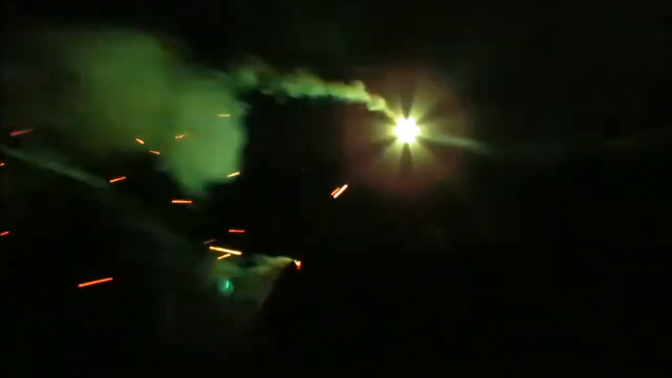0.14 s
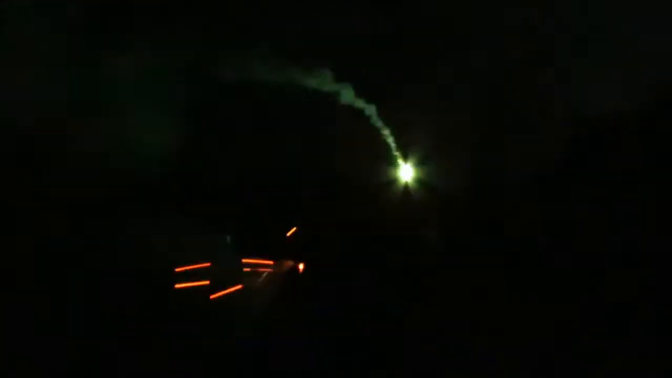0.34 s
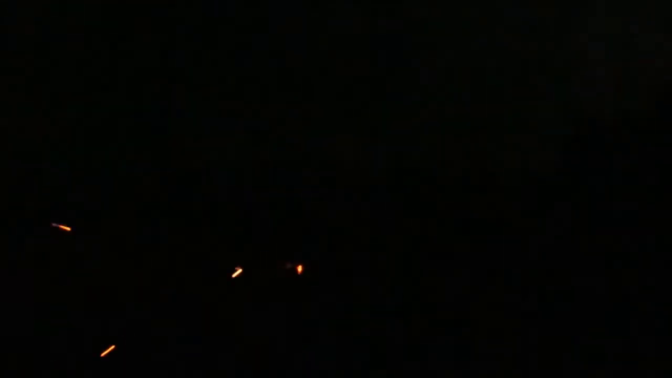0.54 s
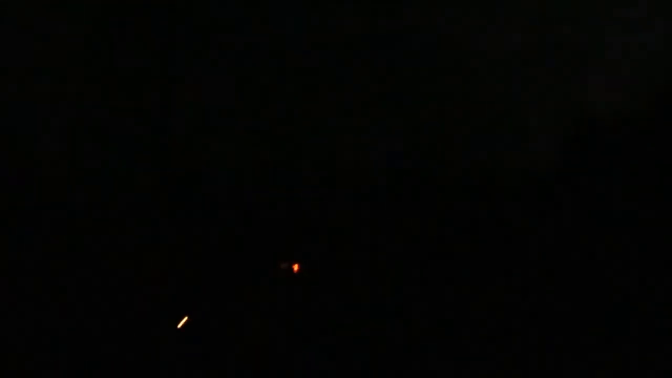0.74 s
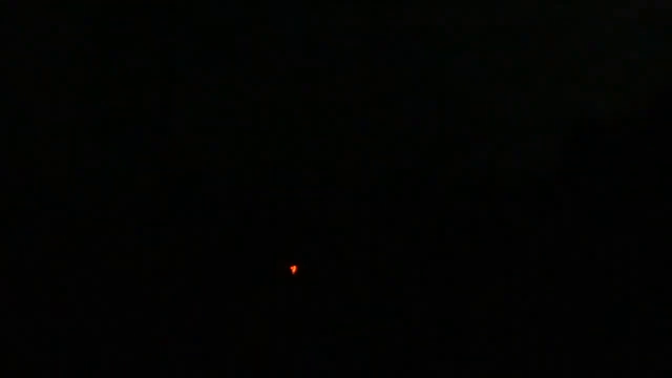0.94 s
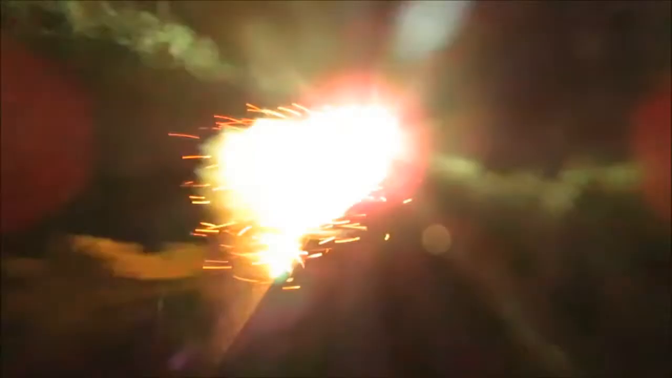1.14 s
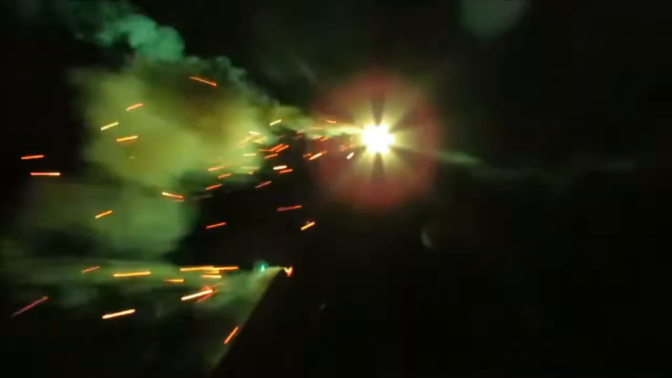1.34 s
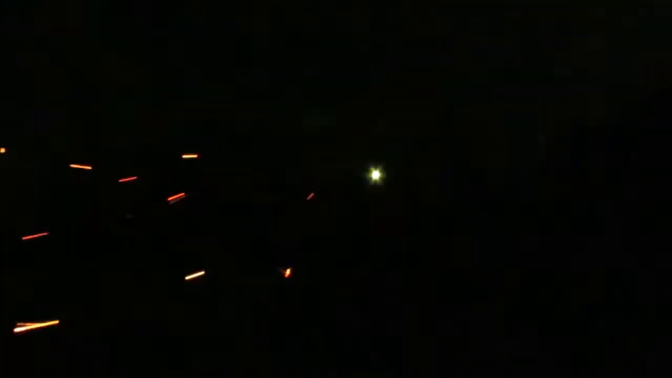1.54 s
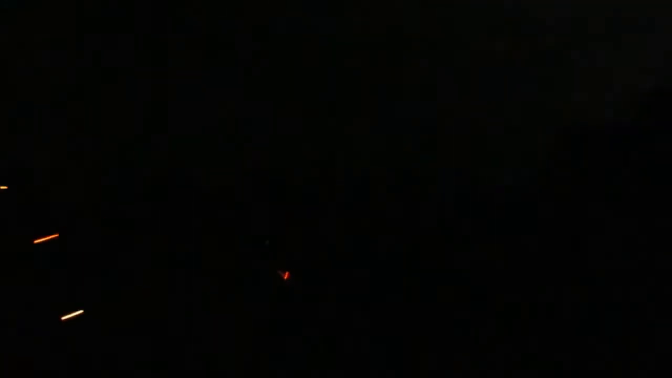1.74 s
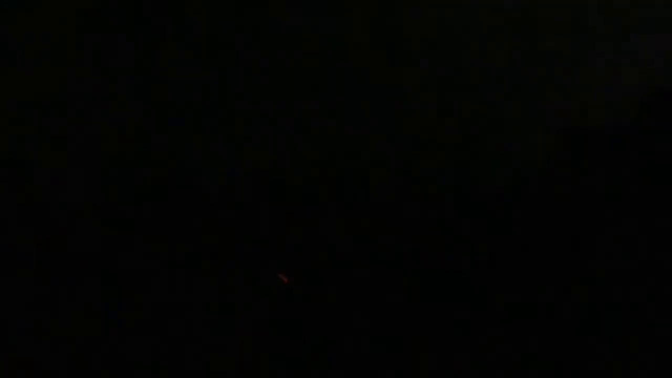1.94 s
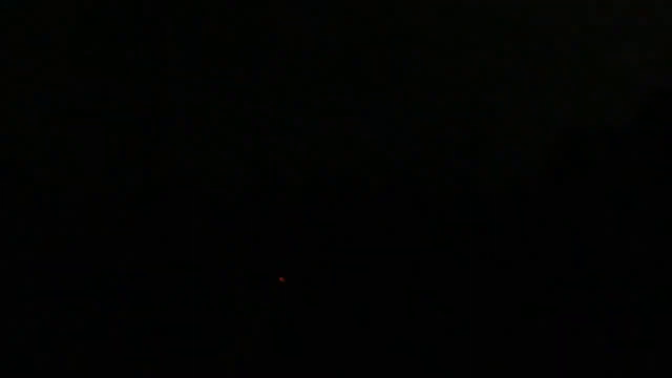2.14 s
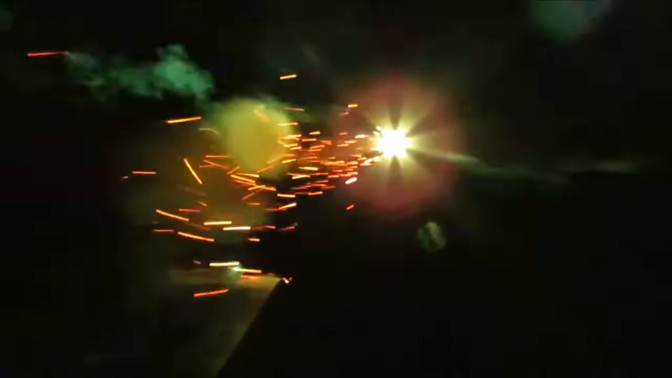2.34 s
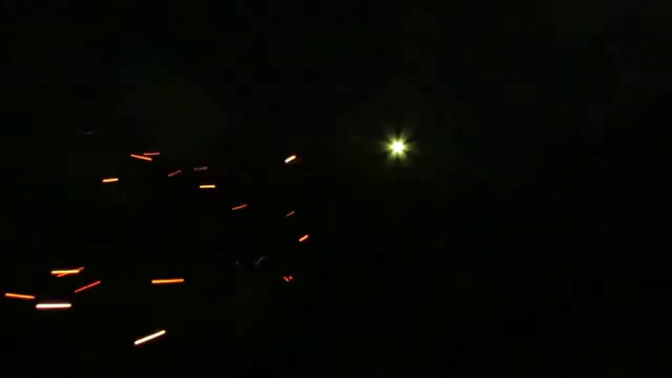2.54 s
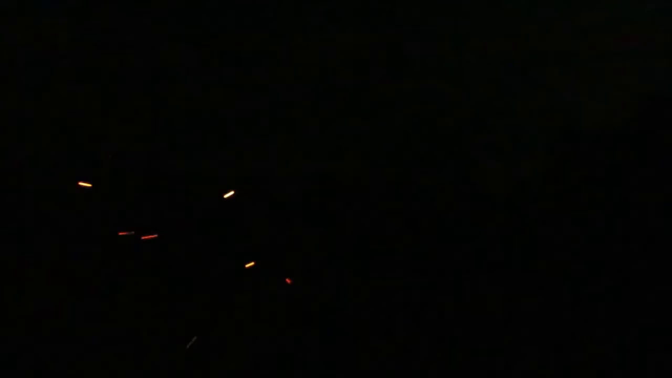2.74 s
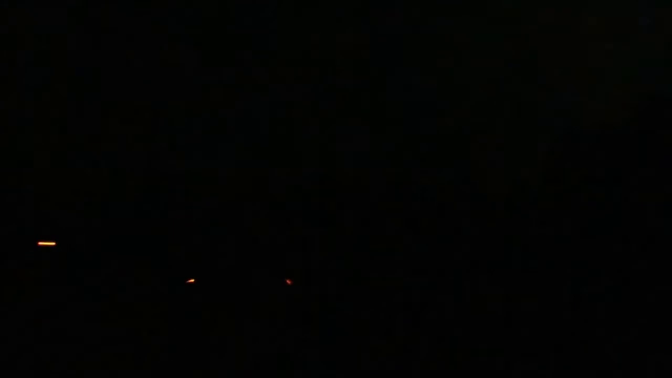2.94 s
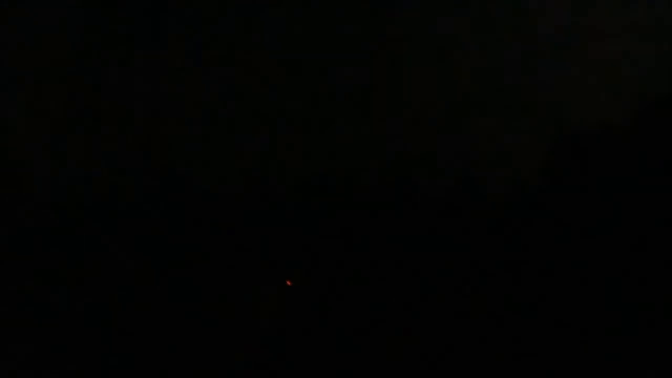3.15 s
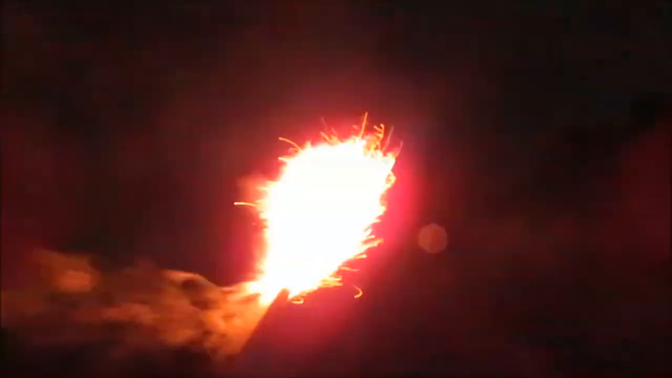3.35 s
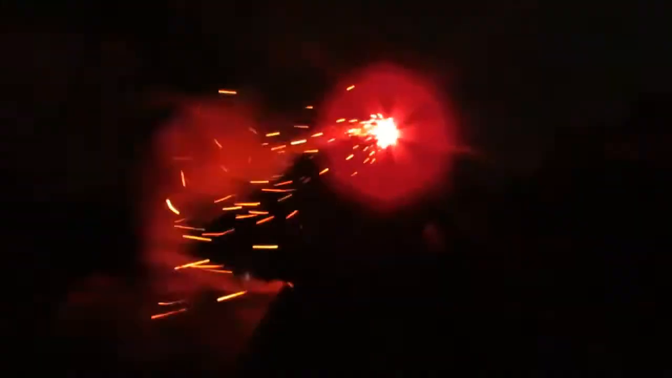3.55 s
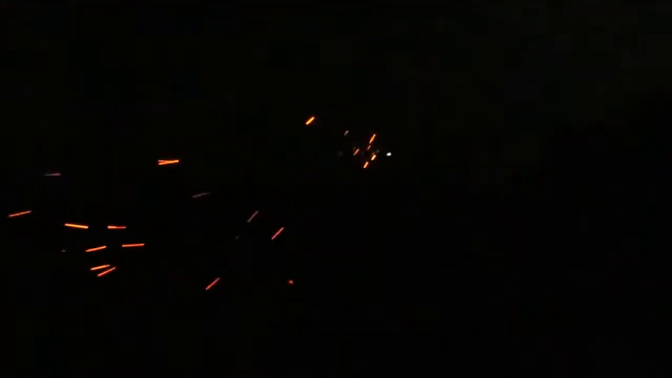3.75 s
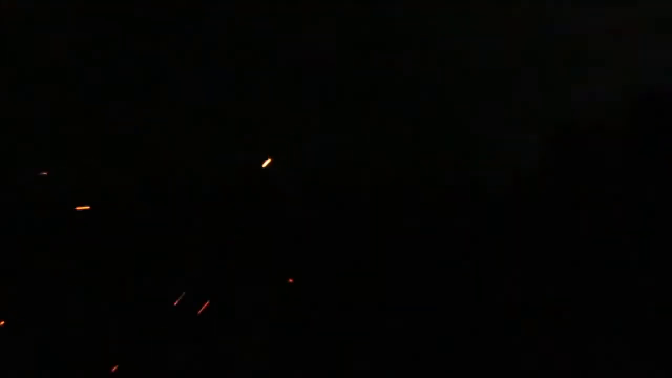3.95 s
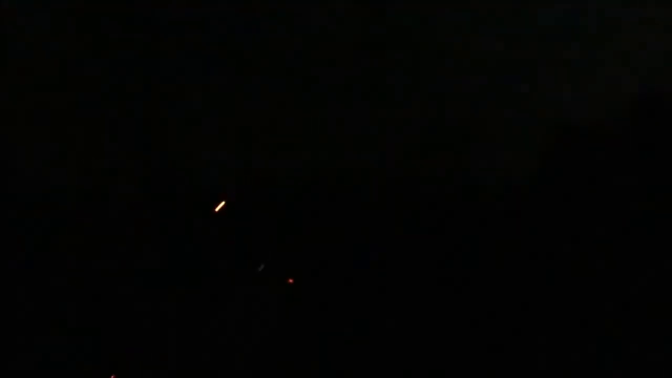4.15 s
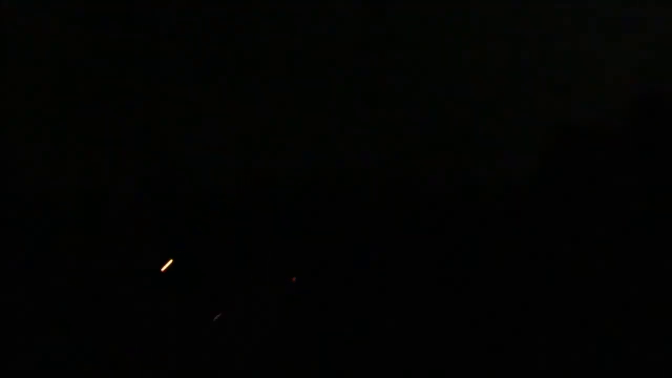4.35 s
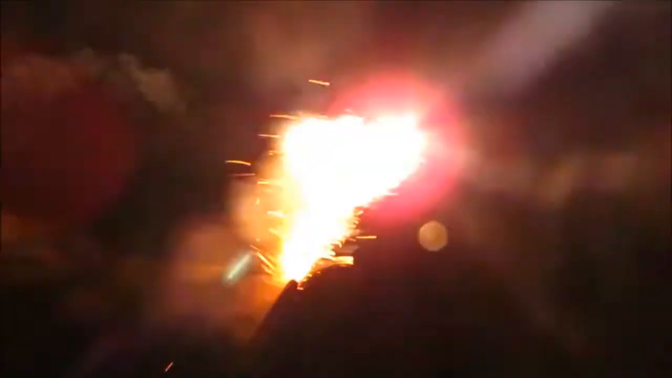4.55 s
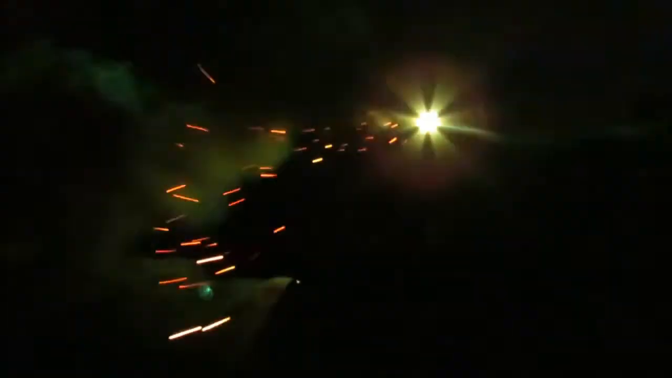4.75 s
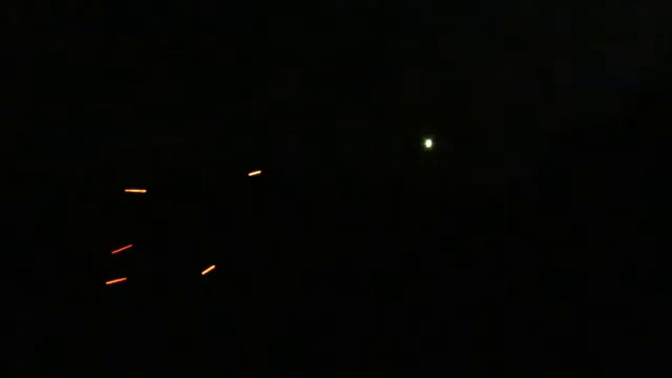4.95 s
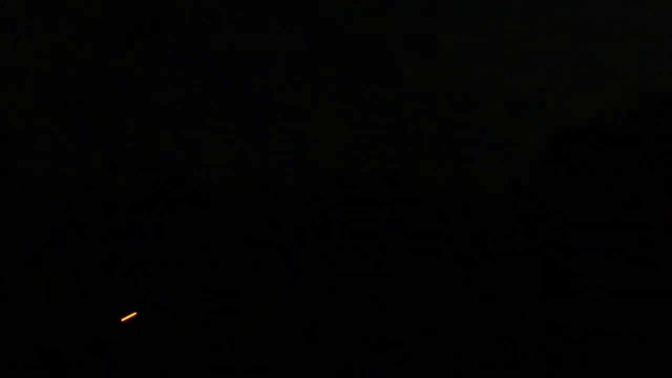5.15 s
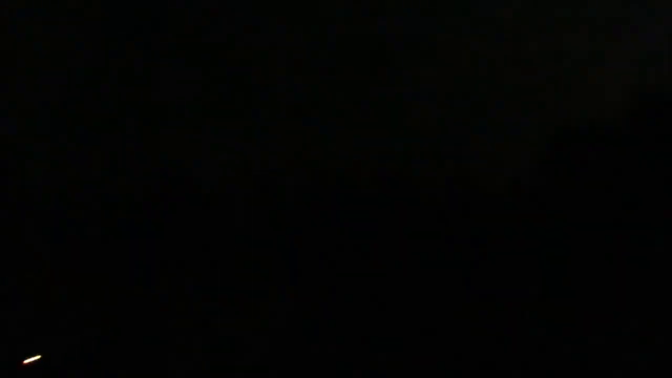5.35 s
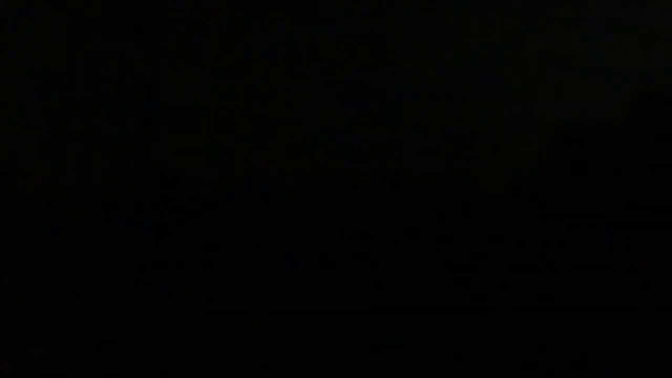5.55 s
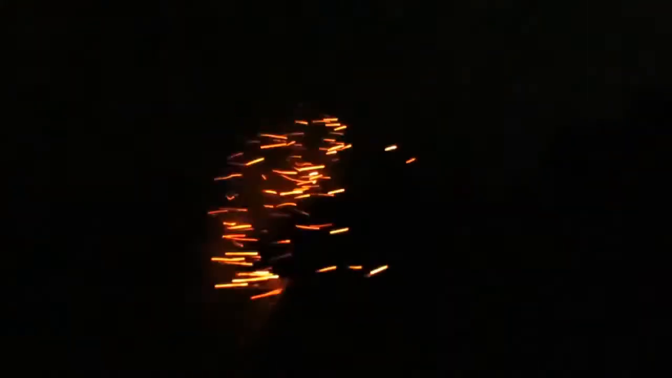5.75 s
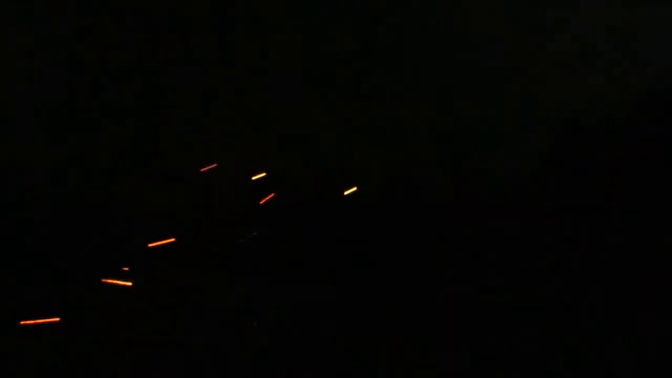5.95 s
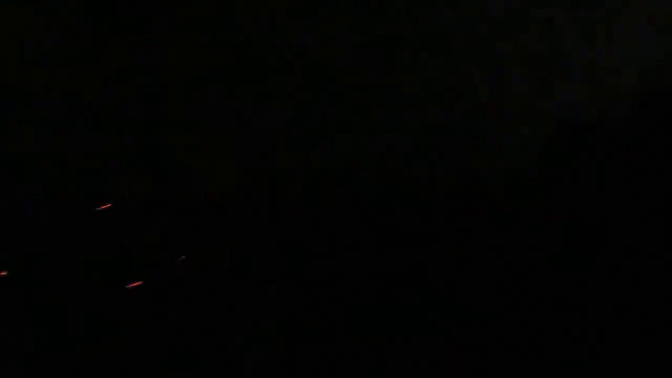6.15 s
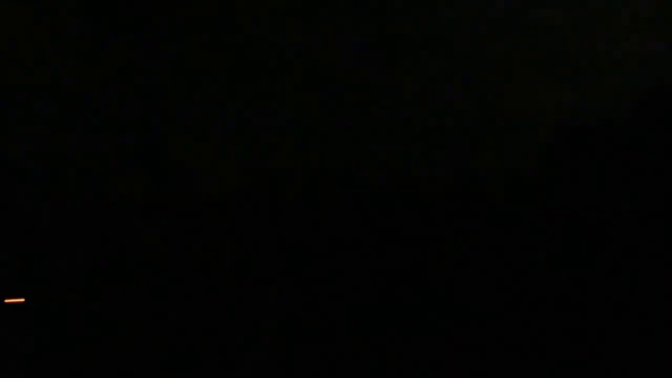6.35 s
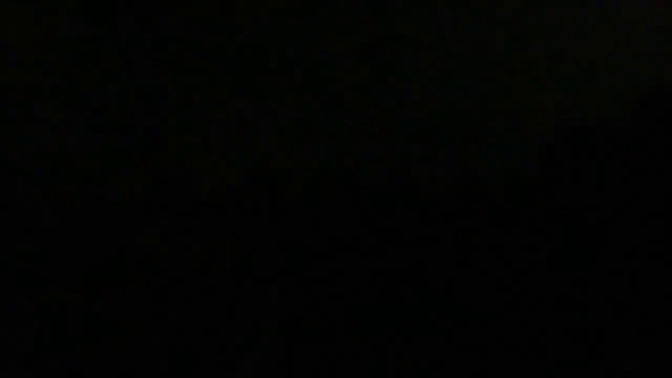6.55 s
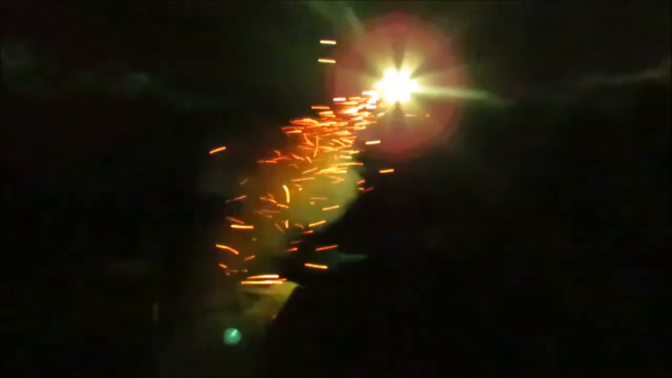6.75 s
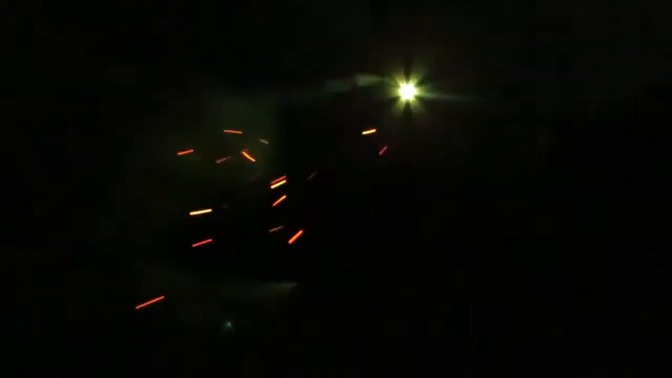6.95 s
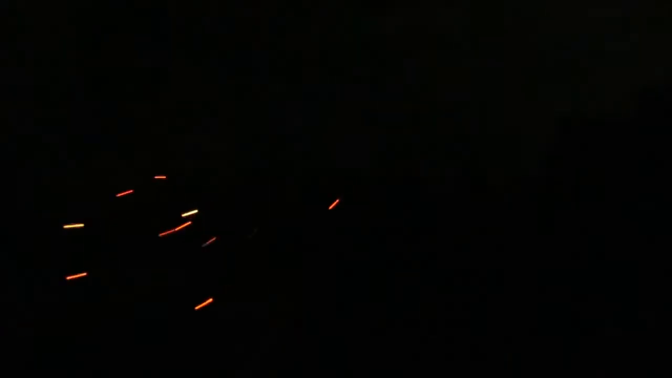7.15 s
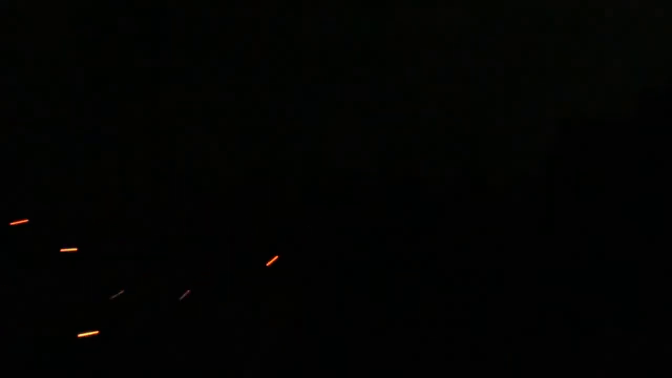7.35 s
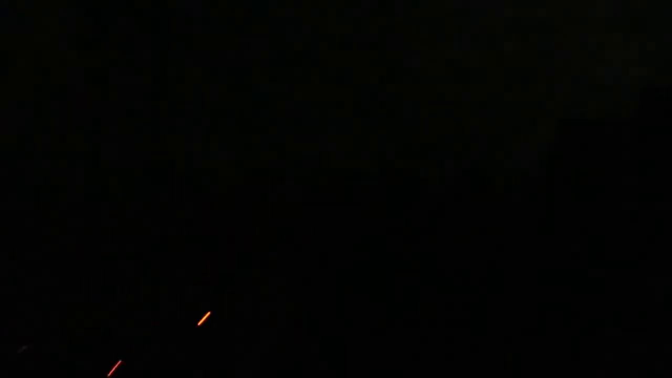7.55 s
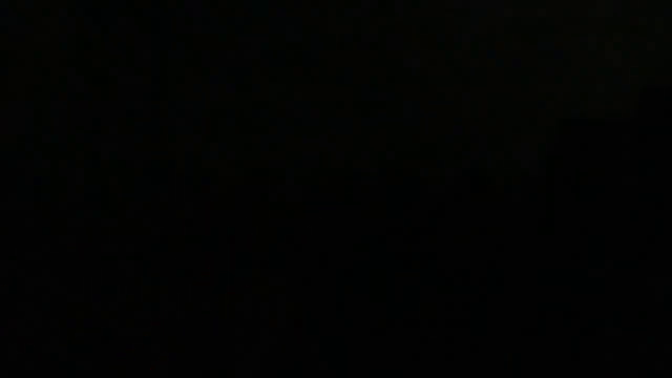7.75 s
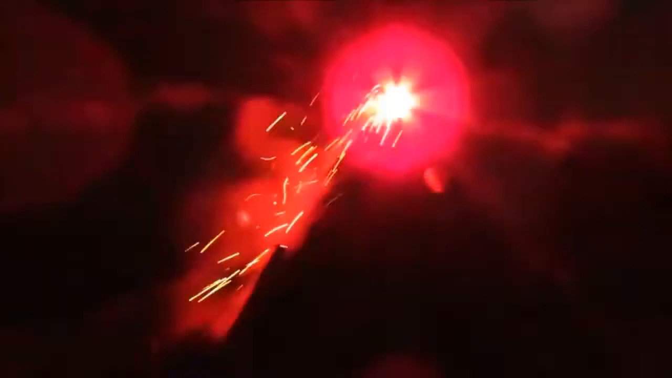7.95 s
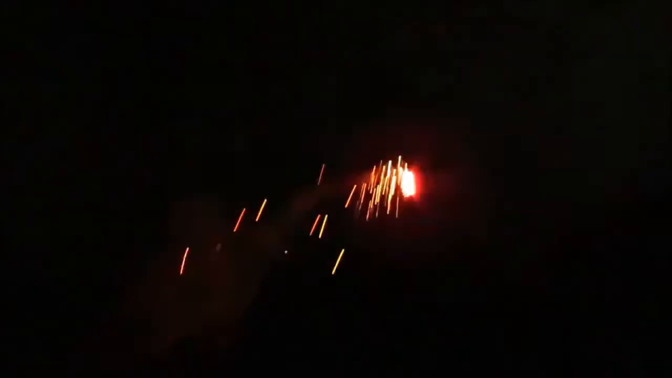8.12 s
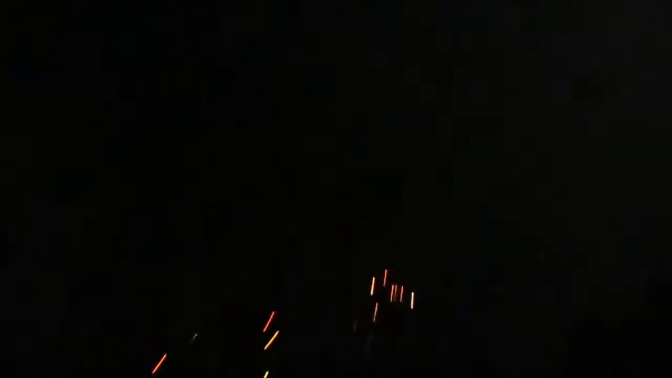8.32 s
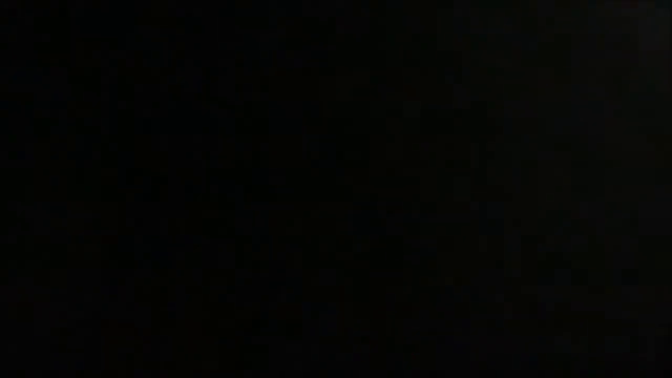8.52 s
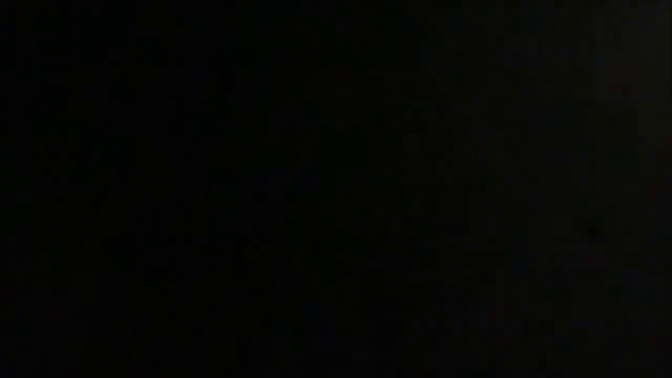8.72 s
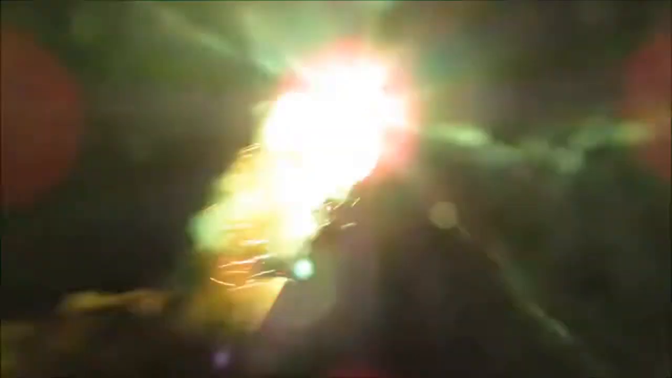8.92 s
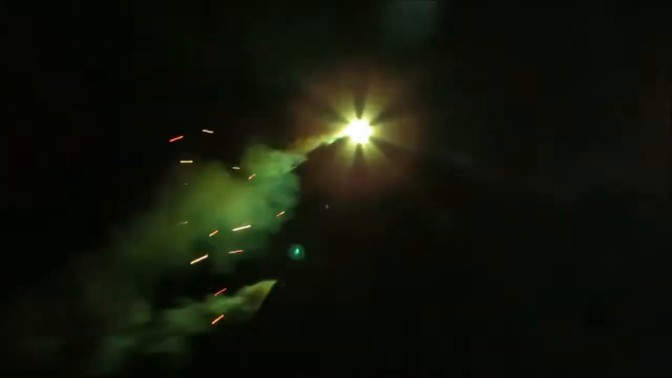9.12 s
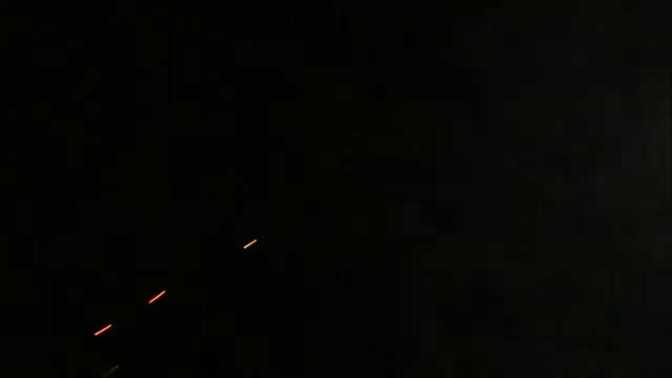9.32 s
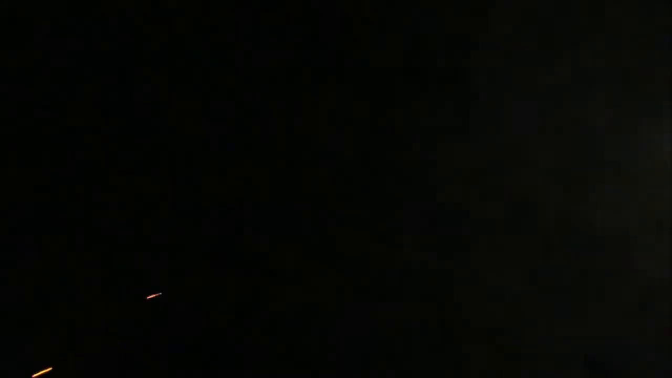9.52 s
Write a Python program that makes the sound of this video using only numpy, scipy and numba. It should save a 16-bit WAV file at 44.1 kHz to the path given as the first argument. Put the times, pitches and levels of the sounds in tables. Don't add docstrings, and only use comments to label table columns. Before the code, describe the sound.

Close firework tube sputters and hisses, then bangs roughly once a second, burning stars whooshing away over light wind rumble and short dull echoes.

```python
import sys
import numpy as np
from scipy import signal
from scipy.fft import rfft, irfft, next_fast_len
from scipy.io import wavfile
from scipy.ndimage import uniform_filter1d
from numba import njit

SR = 44100
rng = np.random.default_rng(int(sys.argv[2]) if len(sys.argv) > 2 else 0)


def log_audio(samples):
    frames = np.atleast_2d(samples).T
    limited = np.clip(frames, -1, 1)
    pcm = np.round(limited * 32767).astype(np.int16)
    wavfile.write(sys.argv[1], SR, pcm)


def elevation(decibels):
    levels = np.asarray(decibels, float)
    return 10 ** (levels / 20)


N = 422478

# [t/s, level/dB, fade/s, roar from f/Hz, roar to f/Hz]
STAR_FLIGHTS = [(0, -45, .5, 1400, 3070), (1.15, -45, 0.23, 1197, 3600), (2.259, -44.5, 0.17, 1194, 5390),
                (3.409, -45.5, 0.19, 977, 4600), (4.57, -51, 0.29, 902, 5970), (5.68, -56, 0.21, 888, 4060),
                (6.689, -55, 0.32, 1493, 4550), (7.88, -51.5, 0.23, 1630, 4330),
                (8.879, -49.5, 0.33, 1510, 4200)]
# [t/s, blast level/dB, rise/ms, fall/ms, trail level/dB]
LIFT_CHARGES = [(1.1471, -3.5, 4.7, 10.7, -21.5), (2.2544, -6, 0.7, 13.4, -25),
                (3.4015, -10, 3.7, 15.6, -21), (4.5668, -4.5, 1.44, 8.8, -19.5),
                (5.68, -8.5, 2.6, 10.7, -23.5), (6.686, -5.5, 3.4, 7.4, -21),
                (7.8772, -8.5, 1.5, 11.5, -19), (8.8706, -11, 3.9, 13.3, -21)]


def curve(table):
    s, *columns = np.transpose(table)
    return [np.interp(np.arange(N) / SR, s, c) for c in columns]


def shaped(x, gain):
    size = next_fast_len(len(x))
    hz = np.maximum(np.arange(size // 2 + 1) * SR / size, 1)
    return irfft(rfft(x, size) * gain(hz), size)[:len(x)]


def colour(x, points):
    hz, db = np.transpose(points)
    y = shaped(x, lambda f: elevation(np.interp(np.log(f), np.log(hz), db)))
    return y / np.std(y)


def walk(rate):
    k = int(SR / rate)
    steps = np.repeat(rng.standard_normal(N // k + 1), k)
    y = uniform_filter1d(uniform_filter1d(steps, k), k)[:N]
    return y / np.std(y)


def swell(s, rise, fall):
    ms = np.arange(-SR // 4, SR // 8) * 1000 / SR
    start = int(s * SR) - SR // 4
    envelope = np.exp(-np.where(ms < 0, -ms / rise, (np.abs(ms) / fall) ** 1.5))
    return slice(start, start + len(ms)), envelope


def even(x, ms):
    size = int(ms * SR / 1000)
    return x / np.sqrt(uniform_filter1d(uniform_filter1d(x ** 2, size), size))


@njit
def pipe(x, lag, echo, damp):
    y, soft = np.zeros(len(x)), 0.
    for i in range(64, len(x)):
        k = int(lag[i])
        back = y[i - k] + (lag[i] - k) * (y[i - k - 1] - y[i - k])
        soft += (1 - damp) * (back - soft)
        y[i] = x[i] - echo[i] * soft
    return y


def tube(x, echo):
    # [t/s, quarter-wave resonance f/Hz]
    emptying = [(0, 2250), (.3, 2230), (.55, 1930), (.9, 1850), (1.65, 1630), (2.05, 1535), (2.75, 1435),
                (3.2, 1362), (3.6, 1186), (3.95, 1110), (4.35, 1090), (5.4, 1000), (6.4, 943), (7.0, 897),
                (7.5, 829), (8.5, 778), (9.58, 721)]
    heat_rise, cooling_s = 0.065, 0.24
    treble_lag = .75
    t = np.arange(N) / SR
    heat = sum((t > s) * np.exp(-np.abs(t - s) / cooling_s) for s, *_ in STAR_FLIGHTS[1:])
    resonance_hz = curve(emptying)[0] * (1 + heat_rise * heat)
    lag = np.clip(SR / 2 / resonance_hz - treble_lag, 2, 60)
    return pipe(x, lag, echo * np.ones(N), .5)


def burn():
    # [lit t/s, fizz level/dB, sag/dB per s, tube echo/0-1, darkness/dB]
    layers = [(0, -42.5, 7, 0.57, 1), (1.15, -52, 6.5, 0.58, 1), (2.256, -57.5, 4, .57, 1.5),
              (3.403, -58, 3.5, 0.58, 2), (4.568, -57.5, 4, 0.66, .5), (5.681, -58, 1.5, .6, 1.5),
              (6.687, -60, 5.5, 0.61, 1), (7.879, -56.5, 2, 0.44, 2), (8.872, -56, 3.5, 0.48, 0.5)]
    flare_db, flare_dark_db, flare_s = 3.5, 3, .2
    build_db, build_dark_db, build_s = -1.2, 2.6, 0.24
    t, rows = np.arange(N) / SR, np.array(layers)
    alight = np.clip(np.searchsorted(rows[:, 0], t) - 1, 0, None)
    lit, db, sag, echo, dark_db = rows[alight].T
    fresh = np.exp(-np.abs(t - lit) / flare_s) * np.where(t > LIFT_CHARGES[0][0], 1, -1)
    near = sum((t < s) * np.exp(-np.abs(s - t) / build_s) for s, *_ in LIFT_CHARGES)
    level_db = db - sag * (t - lit) + flare_db * fresh + build_db * near
    return level_db, echo, dark_db + flare_dark_db * np.abs(fresh) + build_dark_db * near


def fizz():
    # [t/s, level/dB, rise/ms, fall/ms]
    surges = [(1.128, -27, 17, 6), (1.089, -30.5, 4, 5.5), (1.077, -39, 13, 12), (1.108, -34, 3.6, 5),
              (.737, -47, 8, 18), (.26, -51, 60, 60), (6.675, -39.5, 16, 4), (4.2, -70, 10, 5),
              (8.845, -48, 6.2, 5), (1.1, -47.5, 15, 38), (2.385, -52, 25, 35), (3.52, -52, 25, 35),
              (5.87, -57, 20, 24), (6.06, -58.5, 18, 40), (6.33, -58.5, 33, 43)]
    # [f/Hz, level/dB]
    fizz_tone = [(30, -27.5), (100, -11), (300, 1), (1000, -4), (3000, -1.5), (6000, -3.5), (10000, -5),
                 (12500, -6.5), (13800, -8), (16000, -9)]
    surge_tone = [(200, -19.5), (900, -8.5), (1900, 0.0), (5000, -7.5), (9000, -14), (16000, -20)]
    mouth_hz = 9500
    db, echo, dark_db = burn()
    power = np.zeros(N)
    for s, surge_db, rise, fall in surges:
        span, shape = swell(s, rise, fall)
        power[span] += (elevation(surge_db) * shape) ** 2
    sputter = elevation(.9 * walk(300))
    gas = colour(rng.standard_normal(N) * sputter, fizz_tone)
    low = shaped(gas, lambda f: 1 / (1 + (f / 4200) ** 4))
    flicker_db = .5 * walk(11) + 0.55 * walk(35)
    steady = (gas + (elevation(dark_db) - 1) * low) * elevation(db + 3.5 + flicker_db)
    flame = steady + colour(gas, surge_tone) * np.sqrt(power)
    rung = tube(flame, echo)
    return rung + shaped(flame - rung, lambda f: .7 - .7 / (1 + (f / mouth_hz) ** 8))


def stars():
    rise_s = 0.06
    out, air = np.zeros(N), rng.standard_normal(N)
    for s, db, fade, from_hz, to_hz in STAR_FLIGHTS:
        def roar_and_hiss(f):
            roar = 1 / np.sqrt((1 + (from_hz / f) ** 1.7) * (1 + (f / to_hz) ** 9))
            return roar + 0.14 / (1 + (f / 12000) ** 4)

        span = slice(int(s * SR), int((s + 1.5) * SR))
        flight = shaped(air[span], roar_and_hiss)
        age = np.arange(len(flight)) / SR
        catching = 1 - np.exp(-(age + (s == 0)) / rise_s)
        leaving = np.exp(-(age / fade) ** 1.7)
        out[span] += flight / np.std(flight) * elevation(db + 1.5) * catching * leaving
    flutter_db = 0.98 * walk(25) + 0.95 * walk(250)
    return out * elevation(flutter_db)


def wind():
    # [t/s, level/dB, half length/s]
    gusts = [(.25, -61.5, 0.41), (.98, -61, 0.11), (1.65, -73, 0.26), (2.3, -70, .2), (3.3, -71, 0.38),
             (4.55, -70.5, 0.11), (5.5, -72.5, .2), (6.75, -70, .35), (7.85, -72, .2), (8.481, -68, 0.073),
             (8.72, -62, 0.11), (9.02, -64.5, .12), (9.35, -64.5, 0.22)]
    calm_db = -78
    rumble_tone = [(15, -9.5), (40, -2), (75, -4.5), (130, -9.0), (300, -24.5), (2000, -68)]
    rumble = even(colour(rng.standard_normal(N), rumble_tone), 60)
    t = np.arange(N) / SR
    power = elevation(calm_db) ** 2
    for s, db, half in gusts:
        power = power + elevation(db) ** 2 * np.exp(-((t - s) / half) ** 2 * 2)
    return rumble * elevation(2.2 * walk(16)) * elevation(3.5) * np.sqrt(power)


def sparks():
    # [t/s, level/dB]
    snaps = [(0.7364, -36.5), (3.3471, -41.5), (3.3682, -35.5), (7.7264, -49.5), (7.7514, -44.5),
             (7.7844, -41), (7.8078, -39)]
    out = np.zeros(N)
    for s, db in snaps:
        at = int((s + .001) * SR)
        out[at:at + 60] = elevation(db + 3.5) * rng.standard_normal(60) * np.exp(-np.arange(60) / 12.)
    return shaped(out, lambda f: f / (f + 2500))


def puffs():
    # [t/s, level/dB, rise/ms,
    # fall/ms]
    catches = [(1.133, -13, .6, 5), (1.137, -18.5, 9.5, 17), (2.2502, -15.5, 2.54, 1.7),
               (3.3904, -40, 2, 2.0), (4.5588, -27.5, 8.2, 15.0), (5.669, -19.5, 2, 2.6),
               (6.6757, -42, 26, 2.0), (7.8673, -35.5, 2.36, 14), (8.8566, -33, 7.4, 6.4),
               (8.882, -12, .4, 1.5)]
    # [t/s, level/dB]
    knocks = [
        (.898, -41),
        (1.008, -51),
    ]
    catch_tone, blast_tone, trail_tone, foot_tone = (-14, -5), (-10, -6.5), (-5, -12), (14, -18)
    foot_db, foot_lag_ms, thump_lag_ms = -39, 32, 7
    jets = [(*row, *catch_tone) for row in catches]
    thumps = [(s, db, 3, 6) for s, db in knocks]
    for s, db, rise, fall, trail_db in LIFT_CHARGES:
        foot_s = s + foot_lag_ms / 1000
        jets.append((s - 0.47 * rise / 1000, db - 2.5 - 1.1 * rise, .3, 3.5, *blast_tone))
        jets.append((s, db, rise, fall, *blast_tone))
        jets.append((s + 1.25 * fall / 1000, trail_db, 3.3, 14.5, *trail_tone))
        jets.append((foot_s, foot_db + 2.7 - foot_tone[0], 6, 11.5, *foot_tone))
        thumps.append((s + thump_lag_ms / 1000, db - 21, 4.5, 15))
        thumps.append((foot_s, foot_db, 6, 11.5))
    return jets, thumps


def shots():
    # [f/Hz, level/dB]
    jet_tone = [(30, -34), (70, -10), (150, -2.5), (400, 0.5), (1300, -1), (3200, -3), (4000, 0),
                (8000, -3.5), (14000, -10.5), (16000, -15)]
    jet = tube(colour(rng.standard_normal(N), jet_tone), 0.1)
    deep = shaped(jet, lambda f: 1 / (1 + (f / 190) ** 6))
    bass = shaped(jet, lambda f: 1 / (1 + (f / 420) ** 6)) - deep
    treble = shaped(jet, lambda f: 1 - 1 / (1 + (f / 3700) ** 12))
    body = jet - deep - bass - treble
    jets, thumps = puffs()
    power = np.zeros((4, N))
    for s, db, rise, fall, bass_db, treble_db in jets:
        span, shape = swell(s, rise, fall)
        share_db = np.array([[bass_db - 2.0], [0], [treble_db + .8]])
        power[:3, span] += (elevation(db + share_db) * shape) ** 2
    for s, db, rise, fall in thumps:
        span, shape = swell(s, rise, fall)
        power[3, span] += (elevation(db) * shape) ** 2
    gain = elevation(-0.42) * np.sqrt(power)
    blast = gain[0] * even(bass, 8) + gain[1] * even(body, 4) + gain[2] * even(treble, 4)
    spatter = elevation(1.8 * walk(800))
    return spatter * blast + gain[3] * even(deep, 12)


def pushes():
    # [t/s, peak level/dB]
    waves = [(1.1496, -17), (2.2595, -25), (3.4024, -22.5), (4.5694, -16), (5.6812, -18.5), (6.6867, -19.5),
             (7.8794, -27.5), (8.871, -26)]
    push_ms = 1.8
    out = np.zeros(N)
    u = np.arange(-SR // 50, SR // 50) * 1000 / SR / push_ms
    for s, db in waves:
        start = int(s * SR) - SR // 50
        out[start:start + len(u)] += elevation(db) * u * np.exp((1 - u ** 2) / 2)
    return shaped(out, lambda f: 1 / np.sqrt(1 + (80 / f) ** 4))


def yard(x):
    t60_s, level_db = .17, -23
    t = np.arange(SR // 2) / SR
    echo = rng.standard_normal(len(t)) * np.exp(-np.log(1000) * t / t60_s) * (t > .003)
    wet = signal.fftconvolve(x, echo / np.sqrt(np.sum(echo ** 2)))[:N]
    return elevation(level_db) * shaped(wet, lambda f: 1 / (1 + (f / 350) ** 2))


def scene():
    blast = shots() + pushes()
    mix = fizz() + stars() + wind() + sparks() + blast + yard(blast)
    return mix[None]


def band_limit(x):
    return signal.sosfilt(signal.butter(12, 16220, fs=SR, output="sos"), x)


def record(dry):
    # [f/Hz, width/Hz, level/dB]
    body_resonances = [(3176, 590, 4), (3850, 800, -3), (6066, 910, -3.5), (9100, 900, -1.5)]
    top_hz, bottom_hz = 15700, 55

    def body_gain(f):
        return elevation(sum(db / (1 + (2 * (f - hz) / width) ** 2) for hz, width, db in body_resonances))

    def band_gain(f):
        return 1 / (1 + (f / top_hz) ** 90) / np.sqrt(1 + (bottom_hz / f) ** 4)

    clipped = np.clip(shaped(dry[0], body_gain), -.93, .93)
    mix = shaped(clipped, band_gain)
    return band_limit(mix[None])


dry = scene()
out = record(dry)
log_audio(out)
```